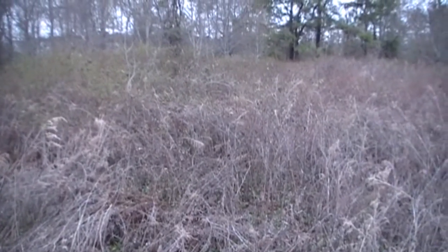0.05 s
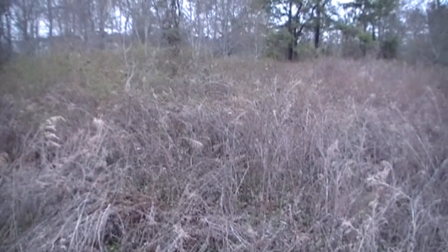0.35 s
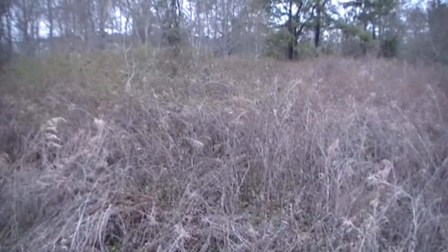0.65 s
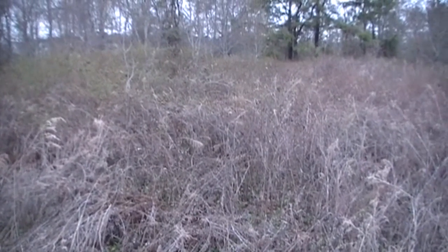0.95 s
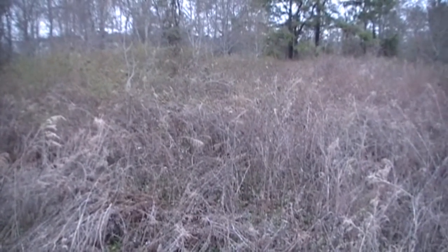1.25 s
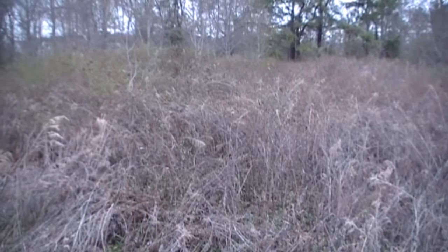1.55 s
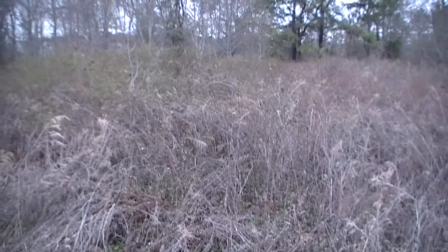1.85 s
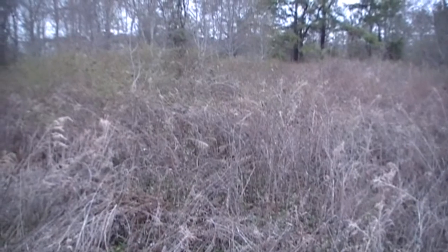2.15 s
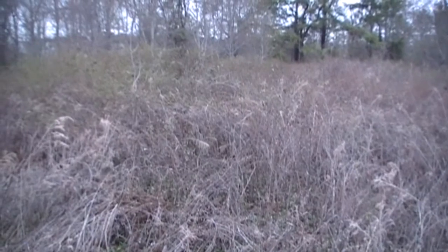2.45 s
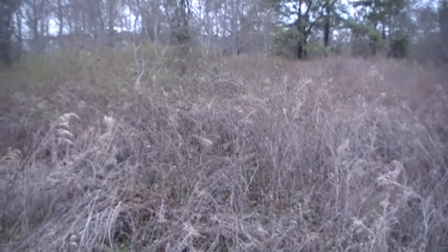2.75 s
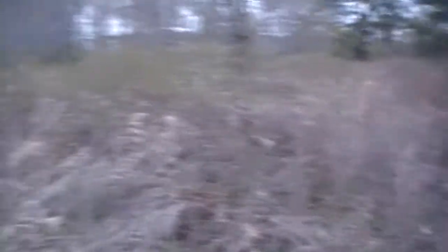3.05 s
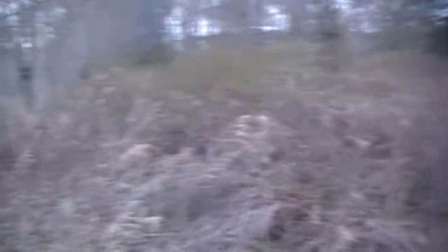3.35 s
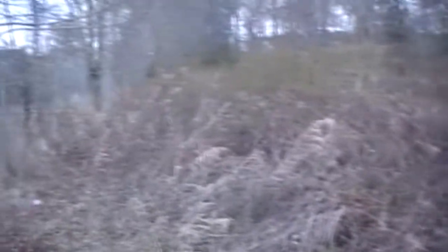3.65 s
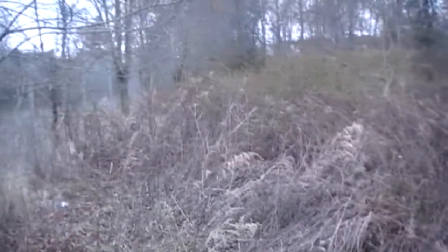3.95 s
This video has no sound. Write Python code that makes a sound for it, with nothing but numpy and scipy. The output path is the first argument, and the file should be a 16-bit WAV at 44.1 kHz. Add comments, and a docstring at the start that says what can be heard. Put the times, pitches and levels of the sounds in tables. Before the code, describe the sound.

A distant chorus of high, peeping frogs carries on for all four seconds over the soft wash and hum of a far road. Dry grass rustles faintly close by, with a sharp stalk tick at about 1 second and smaller ones after. Faint birds trill around 1.5 to 2 seconds. A nearby twig snaps sharply at about 2.8 seconds, and thin bird whistles grow busier after 3 seconds.

```python
"""A far chorus of peeping frogs carries over an overgrown field, above the wash of a distant road.
Each frog repeats a short rising whistle; the road is shaped noise with tyre whine and engine hum.
Small birds whistle and trill faintly from the trees, on gliding, fluttering sine tones.
Up close, dry grass rustles in tiny grains of noise, stalks tick, and one twig snaps and rings briefly."""
import sys
import numpy as np
from scipy import signal
from scipy.fft import rfft, irfft
from scipy.io import wavfile
from scipy.ndimage import uniform_filter1d

SR = 44100
rng = np.random.default_rng(int(sys.argv[2]) if len(sys.argv) > 2 else 0)


def master(y):
    """Save y as 16-bit WAV."""
    cut = np.clip(np.atleast_2d(y).T, -1, 1)
    pcm = np.round(cut * 32767)  # scale
    wavfile.write(sys.argv[1], SR, pcm.astype(np.int16))


N = 176400
T = np.arange(N) / SR
BIRD_T60_S = 0.21

# stereo image of wide, far sound: freq_hz, coherence (0-1), left_over_right_db, left_lead_rad
FAR_IMAGE = [(50.3, 0.88, -4, 0.3), (108, 0.4, -3.5, 0.013), (232, 0.77, -2, 1), (427, 0.81, 0.5, 0.95),
             (690, 0.48, 1, 0.089), (1140, 0.25, 2, 0.89), (2200, 0, 1.5, 1), (4880, 1, 0, 0),
             (8100, 1, -1.5, 0.23)]
# tone of dry blades rubbing: freq_hz, level_db
GRASS_EQ = [(1000, -42), (2500, -5), (4400, 4), (6300, 1.5), (8200, 6), (9300, 6.5), (10800, 11),
            (12200, 9), (13000, -5)]


def amp(db):
    """Decibels to gain."""
    return 10 ** (np.asarray(db) / 20)


def unit(x):
    """Scales to rms 1."""
    return x / np.sqrt(np.mean(abs(x) ** 2) + 1e-20)


def ride(points):
    """A fader ride: straight lines between points in time."""
    return np.interp(T, *np.transpose(points))


def at_hz(points, hz, column=1):
    """Reads a table column along a log-frequency axis."""
    columns = np.transpose(points)
    return np.interp(np.log(hz + 1), np.log(columns[0]), columns[column])


def add(mix, start_s, sound):
    """Mixes a sound in at a time, which may lie before zero."""
    at = int(round(start_s * SR))
    sound = sound[max(-at, 0):]
    part = mix[max(at, 0):][:len(sound)]
    part += sound[:len(part)]


def noise(eq, envelope=1):
    """White noise under an envelope, then an EQ that rolls off below its first point; rms 1."""
    hz = np.fft.rfftfreq(N, 1 / SR)
    gain = amp(at_hz(eq, hz)) * np.minimum(hz / eq[0][0], 1) ** 2
    return unit(irfft(rfft(envelope * rng.standard_normal(N)) * gain, N))


def waver(rate_hz):
    """Random drift up to about the given rate; rms 1."""
    rolloff = 1 + (np.fft.rfftfreq(N, 1 / SR) / rate_hz) ** 4
    return unit(irfft(rfft(rng.standard_normal(N)) / rolloff, N))


def swell(peak_s, width_s):
    """A bell-shaped fade in and out."""
    return np.exp(-.5 * ((T - peak_s) / width_s) ** 2)


def burst(start_s, decay_s):
    """Instant attack, exponential decay."""
    return (T >= start_s) * np.exp(-np.maximum(T - start_s, 0) / decay_s)


def scatter(x, wet, t60_s):
    """Reverb from trees and brush, different on each side."""
    tail = rng.standard_normal((2, SR)) * amp(-60 * T[:SR] / t60_s)
    tail /= np.linalg.norm(tail, axis=1, keepdims=True)
    reverb = signal.fftconvolve(np.atleast_2d(x), tail, axes=1)[:, :x.shape[-1]]
    return np.sqrt(1 - wet) * x + np.sqrt(wet) * reverb


def frogs(count=420, pool_count=6):
    """Each frog repeats a short rising whistle at its own pitch and pace, from one of several pools."""
    # chorus fader: time_s, level_db
    fader = [(0, -46.5), (1.2, -45), (1.6, -47.5), (1.85, -45), (2.2, -46.5), (3, -45.5), (4, -46)]
    # chorus position as the microphone turns: time_s, left_over_right_db
    position = [(0, 3), (2.5, 2.5), (3.1, .5), (4, -0.5)]
    centre_hz, spread_hz, rise_hz, wander_hz = 2983, 190, 248.4, 30.39
    typical_peep_s, typical_period_s = 0.10986, .8
    pools = np.zeros((pool_count, N + SR))  # one second of pre-roll
    for i, (pitch, size, pace, phase) in enumerate(rng.standard_normal((count, 4))):
        t = np.arange(0, typical_peep_s * np.exp(0.1533 * pace), 1 / SR)
        progress = t / t[-1]
        hz = centre_hz + spread_hz * np.clip(pitch, -2, 1.75) + rise_hz * (progress - .5)
        cycles = np.cumsum(hz) / SR
        frog_db = -0.5 * np.tanh(size) - 2 * pitch ** 2  # frogs far from the common pitch are fainter
        envelope = amp(frog_db) * np.sin(np.pi * progress)
        period_s = typical_period_s * np.exp(.1 * pace)
        for k, (late, wander, accent) in enumerate(rng.standard_normal((8, 3))):
            peep = amp(3 * accent) * envelope * np.sin(2 * np.pi * (cycles + wander_hz * wander * t))
            add(pools[i % pool_count], (k - phase % 1 + .06 * late) * period_s, peep)
    chorus = sum(scatter(pool, wet=0.74, t60_s=0.76) for pool in pools)[:, SR:]
    pan_db = ride(position) / 2
    throb_db = 0.42 * waver(rate_hz=12)  # the calls bunch together
    return unit(chorus) * amp(ride(fader) + throb_db + np.array([pan_db, -pan_db]))


def far_spectra(size):
    """Short-time noise spectra of a wide, far source, partly alike on left and right."""
    hz = np.fft.rfftfreq(size, 1 / SR)
    parts = rng.standard_normal((4, 4 * N // size + 5, len(hz)))
    left, unrelated = parts[::2] + 1j * parts[1::2]
    coherence = np.clip(at_hz(FAR_IMAGE, hz), 0, 1)
    pan_db = at_hz(FAR_IMAGE, hz, column=2) / 2
    lag = np.exp(-1j * at_hz(FAR_IMAGE, hz, column=3))
    right = (coherence * left + np.sqrt(1 - coherence ** 2) * unrelated) * lag
    return hz, np.array([left * amp(pan_db), right * amp(-pan_db)])


def air(size=2048, patchy_db=2.0, even_below_hz=1100):
    """The bed of far road and open air, even in the bass and gently patchy above."""
    # tone of the bed: freq_hz, level_db
    eq = [(20, -22), (45, -8.5), (75, -1), (110, 1.5), (140, -2.5), (180, -8), (280, -4), (370, -5.5),
          (480, -3), (610, 0), (800, -3.5), (1100, -8), (1700, -14.5), (2400, -19), (3600, -29.5),
          (4300, -22), (6200, -33.5), (9000, -30.5), (11000, -30), (13000, -69)]
    # bed fader: time_s, level_db
    fader = [(0, -46), (1.2, -45.5), (2.3, -45), (2.9, -45), (4, -44.5)]
    hz, spectra = far_spectra(size)
    patches = uniform_filter1d(rng.standard_normal(spectra.shape[1:]), size=8, axis=0)  # smooth in time
    patches = unit(uniform_filter1d(patches, size=20, axis=1))  # and in frequency
    spectra *= amp(at_hz(eq, hz) + patchy_db * patches * hz / (hz + even_below_hz))
    wash = signal.istft(spectra.swapaxes(1, 2), nperseg=size, noverlap=size * 3 // 4)[1][:, :N]
    return unit(wash) * amp(ride(fader))


def traffic():
    """Far tyres whine in narrow noise bands and engines hum on wavering tones; each swells and fades."""
    # tyre whines: peak_s, width_s, centre_hz, half_band_hz, level_db
    whines = [(2.825, 0.14, 601, 16.4, -47), (3.3, 1.96, 568, 85, -58)]
    # engine hums: peak_s, width_s, pitch_hz, level_db
    hums = [(.3, 0.25, 149, -62.5), (.52, 0.12, 95, -56), (1.75, 0.24, 103, -59.5), (2, 0.43, 118.8, -65),
            (2.7, 0.2, 106.6, -59), (3.45, 0.22, 118.4, -53), (4.3, 2.4, 211.2, -63.5)]
    hz, out = np.fft.rfftfreq(N, 1 / SR), np.zeros((2, N))
    for peak_s, width_s, centre_hz, half_band_hz, level_db in whines:
        left = rfft(rng.standard_normal(N)) / (1 + ((hz - centre_hz) / half_band_hz) ** 4)
        lag = np.exp(-1j * at_hz(FAR_IMAGE, centre_hz, column=3))
        right = left * amp(-at_hz(FAR_IMAGE, centre_hz, column=2)) * lag
        out += unit(irfft(np.array([left, right]), N)) * amp(level_db) * swell(peak_s, width_s)
    for peak_s, width_s, pitch_hz, level_db in hums:
        cycles = np.cumsum(pitch_hz * (1 + 0.01006 * waver(rate_hz=2.97))) / SR
        pan_db = at_hz(FAR_IMAGE, pitch_hz, column=2) * np.array([[.5], [-.5]])
        out += unit(np.sin(2 * np.pi * cycles)) * amp(level_db + pan_db) * swell(peak_s, width_s)
    return out


def bird_whistles(buzz_rate_hz=145, full_buzz_hz=260, crossfeed=0.31):
    """Thin gliding whistles, some buzzing with fast pitch flutter, blurred by distance."""
    # bird notes: start_s, length_s, from_hz, to_hz, level_db, buzz (0-1)
    notes = [(0, 0.053, 6360, 6280, -62.5, 0.7), (0.03, 0.071, 2390, 2310, -60.5, .1),
             (0.139, 0.075, 5110, 5160, -67.5, 0), (0.286, 0.076, 1810, 1700, -65, .3),
             (0.422, 0.083, 3970, 4500, -57.5, 0.26), (1.368, 0.12, 4200, 4120, -61.5, 0.73),
             (1.555, 0.04, 1860, 1810, -61.5, .1), (2.116, 0.068, 5600, 5200, -65, 0.9),
             (2.174, 0.16, 5060, 4910, -60.5, 0.47), (2.335, 0.136, 4830, 4705, -54.5, 0.22),
             (2.35, 0.125, 5200, 5100, -66, 0.4), (3.149, 0.078, 5030, 4330, -63.5, 0.5),
             (3.211, 0.066, 4300, 4030, -59, 0), (3.287, 0.088, 3970, 4130, -58, .1),
             (3.403, .11, 4930, 4500, -57.5, 0.86), (3.438, 0.059, 2134, 2077, -55, 0),
             (3.509, 0.12, 4090, 4025, -55, 0.62), (3.586, 0.1, 4050, 4270, -54.5, 0.26),
             (3.675, 0.039, 4150, 3800, -51.5, 0.25), (3.68, 0.14, 4880, 3830, -55.5, 0.15),
             (3.966, 0.068, 4250, 4200, -55, 0.5)]
    song = np.zeros(N)
    for start_s, length_s, from_hz, to_hz, level_db, buzz in notes:
        t = np.arange(0, length_s, 1 / SR)
        progress = t / length_s
        jitter = unit(uniform_filter1d(rng.standard_normal(SR), size=120))[:len(t)]
        flutter = np.sin(2 * np.pi * buzz_rate_hz * t) + .5 * jitter
        hz = from_hz + (to_hz - from_hz) * progress + buzz * full_buzz_hz * flutter
        note = np.sqrt(np.sin(np.pi * progress)) * np.sin(2 * np.pi * np.cumsum(hz) / SR)
        add(song, start_s, amp(level_db) * unit(note))
    far = scatter(song, wet=0.48, t60_s=BIRD_T60_S)
    return far + crossfeed * (far[::-1] - far)


def grass_width():
    """A trace of opposite-polarity noise that widens the close grass sounds."""
    return 0.019 * noise(GRASS_EQ) * np.array([[1], [-1]])


def grass_rustle(grains_per_s=8500, grain_decay_s=0.0027):
    """Dry blades rub in tiny grains, each dying away as a crunch of noise."""
    # rustle fader: time_s, level_db
    fader = [(0, -61), (.14, -65), (.21, -59), (.35, -64.5), (.48, -57.5), (.7, -63), (.82, -58), (.9, -57),
             (1.07, -58.5), (1.13, -52.5), (1.21, -59), (1.26, -60.5), (1.31, -55), (1.42, -65),
             (1.62, -60.5), (1.84, -58.5), (1.94, -69.5), (2.12, -63), (2.43, -67), (2.58, -56),
             (2.72, -67), (2.8, -65), (2.89, -57), (3.07, -65), (3.17, -60), (3.62, -61), (3.79, -54),
             (3.88, -58), (4, -58)]
    strength = rng.standard_normal(N) * amp(2 * np.minimum(rng.exponential(1, N), 4))
    grains = strength * (rng.random(N) < grains_per_s / SR)
    energy = signal.lfilter([1], [1, -np.exp(-2 / (grain_decay_s * SR))], grains ** 2)
    rustle = noise(GRASS_EQ, envelope=np.sqrt(energy))
    flutter_db = 2 * unit(uniform_filter1d(rng.standard_normal(N), size=int(.04 * SR)))
    return (rustle + grass_width()) * amp(ride(fader) + flutter_db)


def bird_rasps():
    """Two faint, far rasps: short swells of midrange noise."""
    # rasps: peak_s, width_s, level_db
    rasps = [(0.3, 0.031, -52), (1.57, 0.019, -49)]
    # tone of a rasp: freq_hz, level_db
    eq = [(1200, -28), (1600, -6), (1800, 2), (2050, -9), (2600, -1), (3900, -6.5), (5200, -19.5)]
    return noise(eq) * sum(amp(level_db) * swell(peak_s, width_s) for peak_s, width_s, level_db in rasps)


def stalk_ticks(ping_hz=10960, ping_peak_s=0.00021):
    """Stiff dry stalks tick with a bright ping and a short crunch."""
    # ticks: start_s, top_db, body_db, decay_s
    ticks = [(0.423, -43, -60, .002), (.477, -45, -47, 0.003), (.595, -48, -50, .002),
             (0.963, -24, -40, 0.001), (.9938, -43, -48, 0.007), (1.0122, -40, -47, 0.0021),
             (1.0523, -36, -49, 0.0024), (1.085, -42, -56, 0.002), (1.102, -47, -41.5, 0.0059),
             (1.1128, -43, -44, 0.0027), (1.125, -34, -45, 0.0019), (1.149, -45, -53, 0.0034),
             (1.164, -47, -46, 0.0023), (1.231, -39, -53, 0.0024), (1.286, -40.5, -41, 0.0022),
             (1.611, -49, -43, 0.002), (2.645, -44, -56, 0.0023), (2.861, -23.5, -34, 0.0019),
             (2.868, -42, -54, 0.0034), (2.8765, -42, -54, .002), (2.8874, -34, -47, 0.0034),
             (2.899, -45, -56, 0.0027), (2.987, -50, -51, 0.0088), (3.3108, -34.5, -34.5, 0.0015),
             (3.722, -45, -61, .003), (3.81, -34, -61, 0.0036)]
    # crisp top of the crunch: freq_hz, level_db
    top_eq = [(5000, -30), (8000, -18), (9800, 9.5), (11000, 8), (13000, 4)]
    # woody body of the crunch: freq_hz, level_db
    body_eq = [(900, -15), (2500, -11), (4200, -3), (7000, -1.5), (10000, -4)]
    top, body = noise(top_eq) + grass_width(), noise(body_eq)
    t = T[:SR // 100]
    ping = t / ping_peak_s * np.exp(1 - t / ping_peak_s) * np.sin(2 * np.pi * ping_hz * t)
    crunches, pings = np.zeros((2, N)), np.zeros(N)
    for start_s, top_db, body_db, decay_s in ticks:
        crunches += burst(start_s, decay_s) * (amp(top_db) * top + amp(body_db) * body)
        add(pings, start_s, amp(top_db - 10) * ping)
    return crunches + pings


def bird_trills(rate_hz=69.3, depth_hz=90, sag_hz=142, left_lead_rad=2.8, right_db=-2):
    """A bird off to the left trills on a sagging pitch, reaching the two sides out of phase."""
    # trills: start_s, length_s, pitch_hz, level_db
    trills = [(1.391, 0.19, 4060, -59), (1.783, .31, 3850, -59)]
    out = np.zeros((2, N))
    for start_s, length_s, pitch_hz, level_db in trills:
        t = np.arange(0, length_s, 1 / SR)
        arch = np.sin(np.pi * t / length_s)
        hz = pitch_hz - sag_hz * arch + depth_hz * np.sin(2 * np.pi * rate_hz * t)
        phase = 2 * np.pi * np.cumsum(hz) / SR
        add(out[0], start_s, amp(level_db) * unit(arch * np.sin(phase + left_lead_rad)))
        add(out[1], start_s, amp(level_db + right_db) * unit(arch * np.sin(phase)))
    return scatter(out, wet=0.063, t60_s=BIRD_T60_S)


def twig_snap(wide_below_hz=2900, echo_s=.0043, low_cut_hz=917):
    """Two quick cracks ring the twig, with a spray of splintering fibres and an echo off the ground."""
    # cracks of the break: start_s, level_db
    cracks = [(2.8363, -1.5), (2.8376, -6)]
    # ringing modes of the twig: pitch_hz, level_db, t60_s
    modes = [(1160, -22.5, 0.01), (1620, -30, 0.005), (2730, -27, 0.011), (2980, -22.5, 0.019),
             (3950, -26.5, 0.02), (4450, -27.5, 0.015), (4950, -31.5, .01), (5330, -24, 0.0068),
             (6820, -28, 0.0042), (8020, -23.5, 0.006), (10100, -42, .007)]
    out, t = np.zeros((2, N)), T[:SR // 10]
    for channel, side in zip(out, (-1, 1)):
        ring = np.zeros(len(t))
        for pitch_hz, level_db, t60_s in modes:
            offset_rad = side * .9 / (1 + (pitch_hz / wide_below_hz) ** 6)  # low modes sound wider
            ring += amp(level_db - 60 * t / t60_s) * np.sin(2 * np.pi * pitch_hz * t + offset_rad)
        for start_s, level_db in cracks:
            add(channel, start_s, amp(level_db) * ring)
    # tone of the splintering fibres: freq_hz, level_db
    splinter_eq = [(1000, -4), (3000, 2.5), (8000, 0.5), (11000, -3), (13000, -12)]
    spray = sum(amp(level_db) * burst(start_s, decay_s=0.0016) for start_s, level_db in cracks)
    out += amp(-18.5) * noise(splinter_eq) * spray
    echo = amp(-12.5) * np.roll(uniform_filter1d(out, size=4), int(echo_s * SR), axis=1)
    return signal.sosfilt(signal.butter(4, low_cut_hz, "highpass", fs=SR, output="sos"), out + echo)


def scene():
    """Frogs and road spread wide; the close grass and twig sit in the middle."""
    return (frogs() + air() + traffic() + bird_whistles() + grass_rustle()
            + bird_rasps() + stalk_ticks() + bird_trills() + twig_snap())


def record(dry, high_cut_hz=13050):
    """A steep high cut on the whole mix."""
    lowpass = signal.firwin(601, high_cut_hz, window=("kaiser", 8), fs=SR)
    return signal.oaconvolve(dry, lowpass[None], "same")


dry = scene()
out = record(dry)
master(out)
```